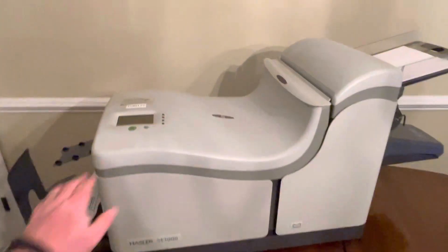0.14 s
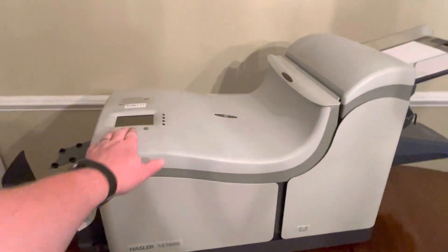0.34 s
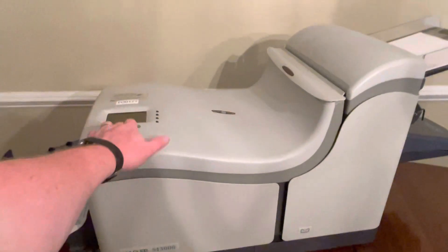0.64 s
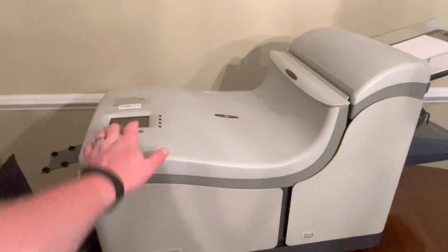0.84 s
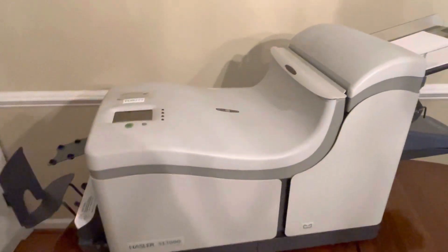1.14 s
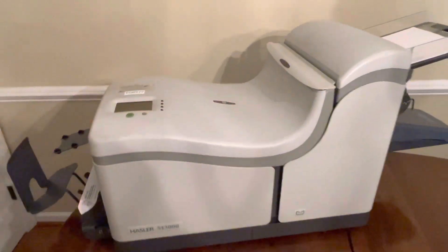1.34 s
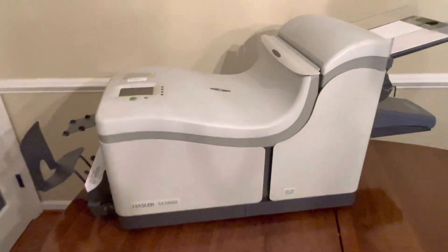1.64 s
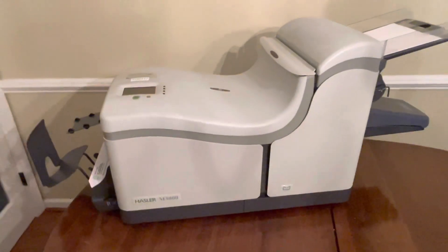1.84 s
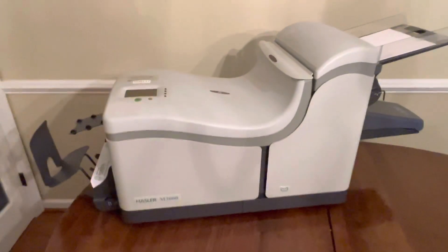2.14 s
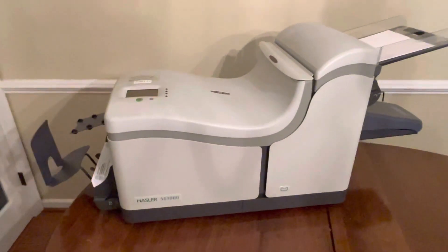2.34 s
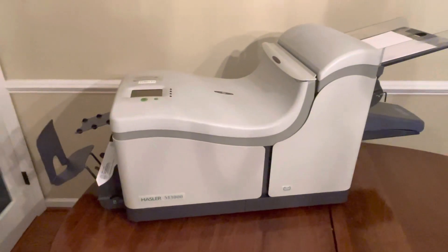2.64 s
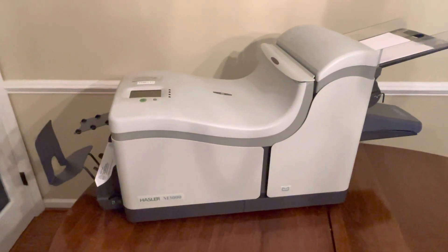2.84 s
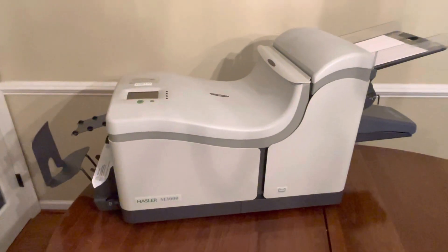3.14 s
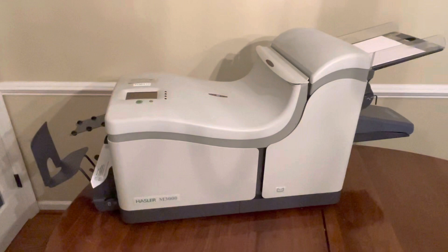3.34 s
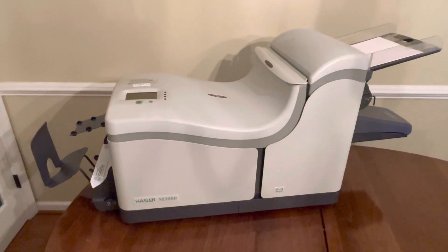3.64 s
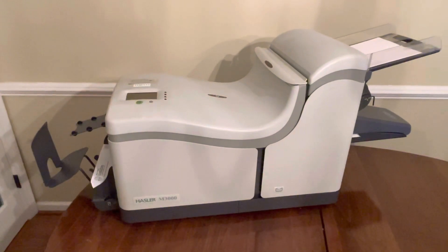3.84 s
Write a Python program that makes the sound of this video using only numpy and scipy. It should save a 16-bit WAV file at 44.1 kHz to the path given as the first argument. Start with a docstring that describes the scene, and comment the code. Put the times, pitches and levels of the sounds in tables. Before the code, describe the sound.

A paper folding machine on a wooden table: near silence, light hand touches and a button click, then motor start, rattling hum, clunks, a sharp metallic snap and paper rustle; close stereo in a small room.

```python
"""A paper folding machine on a wooden table starts up, heard in stereo in a small quiet room.
Brushing noise, finger taps and damped bumps place a hand on the case, which presses the button. A relay ticks
and the motor whines up, then hums in wavering tones over rumbling noise and a growing rattle of dense impacts.
Levers clunk in bursts with a room tail, a steel clutch snaps and rings in narrow dying bands,
and a sheet is drawn through as rustling noise with light ticks that ring the guides."""
import sys
import numpy as np
from scipy import signal
from scipy.fft import rfft, irfft, next_fast_len
from scipy.io import wavfile
from scipy.ndimage import map_coordinates

SR = 44100
rng = np.random.default_rng(int(sys.argv[2]) if len(sys.argv) > 2 else 0)


def persist_wave(psi):
    """Save psi, clipped to +-1, as 16-bit WAV."""
    counts = np.round(np.clip(psi, -1, 1) * 32767).astype(np.int16)
    wavfile.write(sys.argv[1], SR, np.atleast_2d(counts).T)


N = 176400

# how much later the left ear hears the rollers and the levers (s); negative: the left hears first
ROLLER_LAG_S, LEVER_LAG_S = -.00046, .00027
DIRECT_SHARE = .17  # share of the power that comes straight from the machine
# colour of skin on the case: f/Hz, relative level/dB per Hz
BRUSH_SPECTRUM = [(150, -7), (450, -2), (800, -12.5), (1500, -10.5), (2500, -10), (4500, -18), (8000, -35),
                  (14000, -28)]


def amp(db):
    """Decibels to an amplitude factor."""
    return 10 ** (np.asarray(db) / 20)


def unit(x):
    """Scale a sound to rms 1, over both ears together."""
    return x / np.sqrt(np.mean(x ** 2) + 1e-20)


def along(points, hz):
    """Read (f/Hz, value) points on a log frequency axis."""
    f, v = np.transpose(points)
    return np.interp(np.log(hz + 1), np.log(f + 1), v)


def curves(rows):
    """One value per sample for each column after the time."""
    s, *cols = np.transpose(rows)
    return [np.interp(np.arange(N) / SR, s, c) for c in cols]


def wobble(rate):
    """A smooth random curve through rate random knots a second."""
    at = np.linspace(0, N, 4096)
    knots = rng.standard_normal(2048)
    return np.interp(np.arange(N), at, map_coordinates(knots, [at * rate / SR], mode="mirror"))


def tilted(spectrum, slope):
    """The spectrum made brighter by slope dB per octave, pivoting at 1 kHz."""
    return [(hz, db + slope * np.log2(hz / 1000)) for hz, db in spectrum]


def add(out, s, sound):
    """Mix a sound in at time s."""
    part = out[:, round(s * SR):][:, :sound.shape[1]]
    part += sound[:, :part.shape[1]]


def coloured(three, spectrum, lag=ROLLER_LAG_S, share=DIRECT_SHARE):
    """Three unrelated signals become a stereo pair: diffuse room sound, near mono in the bass, plus direct sound."""
    # left-right likeness of the diffuse sound: f/Hz, correlation
    likeness = [(60, 0.78), (150, 1), (260, 0.84), (500, 0.82), (1000, 0.015), (4000, -0.075),
                (10000, 0.016)]
    housing_db, housing_grain_hz = 2.7, 35  # depth and spacing of the parts' many small resonances
    n = three.shape[1]
    m = next_fast_len(n + 8192)
    hz = np.fft.rfftfreq(m, 1 / SR)
    turn = np.arccos(np.clip(along(likeness, hz), -1, 1)) / 2
    ripple = map_coordinates(rng.standard_normal(1024), [hz / housing_grain_hz], mode="mirror")
    ripple *= np.clip(hz / 1500, 0, 1)  # shallower in the bass
    a, b, c = rfft(three, m) * amp(along(spectrum, hz) + housing_db * ripple)
    ears = np.array([[1], [-1]])
    diffuse = a * np.cos(turn) + ears * b * np.sin(turn)
    # half the lag delays the left ear, half advances the right
    direct = c * np.exp(-1j * np.pi * hz * lag * ears)
    pair = np.sqrt(1 - share) * diffuse + np.sqrt(share) * direct
    return unit(irfft(pair, m)[:, :n])


def noise(spectrum, size=N, lag=ROLLER_LAG_S):
    """Steady stereo noise of rms 1 with this spectrum."""
    return coloured(rng.standard_normal((3, size)), spectrum, lag)


def blow(spectrum, rise, t60, room_db, lag=ROLLER_LAG_S):
    """A contact: a short burst from the parts and a room tail that fades at its own rate at each pitch."""
    # fading of the room: f/Hz, t60/s
    room_fade = [(100, 0.54), (500, 0.46), (2000, 0.38), (5000, 0.45), (12000, 0.27)]
    t = np.arange(SR // 2) / SR
    hz, s, z = signal.stft(noise(spectrum, size=len(t), lag=lag), SR, nperseg=256)
    fading = z * amp(-60 * s / along(room_fade, hz)[:, None])
    tail = signal.istft(fading, SR, nperseg=256)[1][:, :len(t)]
    burst = noise(spectrum, size=len(t), lag=lag) * amp(-60 * t / t60)
    return (burst + amp(room_db) * tail) * (1 - np.exp(-t / rise))


def click(lag):
    """The first crack of a hard contact: decaying noise straight from the machine to both ears."""
    # f/Hz, relative level/dB per Hz
    crack_spectrum = [(500, -20), (3000, 3), (8500, -5), (12000, 1), (15500, -7)]
    t60 = 0.011  # s
    t = np.arange(SR // 20) / SR
    burst = rng.standard_normal((3, len(t))) * amp(-60 * t / t60)
    burst = np.roll(burst, SR // 1000, axis=1)  # 1 ms of room for the ear that hears first
    pair = coloured(burst, crack_spectrum, lag, share=1)
    # set the energy by the decay, not by the length of the buffer
    return pair * np.sqrt(t60 * SR / len(t) / np.log(1000))


def ring(modes, rise, spread):
    """Damped sine modes; the higher ones reach the two ears further out of step."""
    t = np.arange(SR // 2) / SR
    out = np.zeros((2, len(t)))
    for hz, db, t60 in modes:
        phase = rng.uniform(0, 2 * np.pi) + spread * hz / 500 * rng.standard_normal((2, 1))
        out += amp(db - 60 * t / t60) * np.sin(2 * np.pi * hz * t + phase)
    return out * (1 - np.exp(-t / rise))


def jangle(clusters, rise):
    """Clusters of close modes: each is a narrow band of noise that dies away."""
    t = np.arange(SR // 2) / SR
    f = np.fft.rfftfreq(len(t), 1 / SR)
    out = np.zeros((2, len(t)))
    for hz, width, db, t60 in clusters:
        spectrum = rfft(rng.standard_normal((2, len(t)))) / (1 + (2 * (f - hz) / width) ** 4)
        out += unit(irfft(spectrum, len(t))) * amp(db - 60 * t / t60)
    return out * (1 - np.exp(-t / rise))


def tones(lines, waver_db, drift, speed=1):
    """Lines on a shared, slightly unsteady shaft speed; each flutters on its own, the bass ones less."""
    # the left-right part changes as the microphone moves: t/s, level/dB of the opposite part
    stereo_width = [(.75, -1), (1.5, -4), (2.2, -3), (2.6, -1), (4, -2)]
    waver_per_s = 15
    shaft = np.cumsum(speed + drift * wobble(7)) / SR
    width_db, = curves(stereo_width)
    out = np.zeros((2, N))
    for hz, common_db, opposite_db in lines:
        loose = min(hz / 200, 1)  # full flutter from 200 Hz up
        phase = 2 * np.pi * hz * shaft + rng.uniform(0, 2 * np.pi) + 0.32 * loose * wobble(16)
        common_waver = loose * waver_db * (wobble(waver_per_s) - 0.99)
        opposite_waver = loose * waver_db * (wobble(waver_per_s) - 1.14)
        common = amp(common_db + common_waver) * np.sin(phase)
        opposite = amp(opposite_db + width_db + opposite_waver) * np.cos(phase)
        out += np.sqrt(2) * np.array([common + opposite, common - opposite])
    return out


def quiet_room():
    """Faint room noise with a low, gently wavering tone."""
    # f/Hz, relative level/dB per Hz
    room_spectrum = [(25, -23), (55, 6), (110, -10), (190, -12), (310, -25), (550, -28), (1150, -37),
                     (2400, -28), (6500, -42), (15000, -45)]
    low_tone = tones([(196, 0.014, -9)], waver_db=2.0, drift=0.0032)
    return amp(-73.5) * noise(room_spectrum) + amp(-79) * low_tone


def hand_brush():
    """Skin brushing the case: noise whose level follows the hand and trembles."""
    # t/s, level/dB
    brush_level = [(0, -77), (.06, -88), (.13, -92), (.19, -91), (.26, -76), (.33, -83), (.4, -84),
                   (.45, -90), (.53, -68.5), (.65, -84)]
    return amp(curves(brush_level)[0] + 3.5 * wobble(32.7)) * noise(BRUSH_SPECTRUM)


def touches():
    """Fingers tap the case lightly on their way to the button: short bright bursts."""
    # t/s, level/dB
    taps = [(.243, -71), (.366, -72), (0.531, -61)]
    out = np.zeros((2, N))
    for s, db in taps:
        add(out, s, amp(db) * blow(tilted(BRUSH_SPECTRUM, 1.8), rise=.0006, t60=.025, room_db=-12))
    return out


def bumps():
    """The hand and the starting jolt shake the case, and the machine rocks on its table in damped low modes."""
    # t/s, level/dB
    shakes = [(0.314, -55), (0.349, -58), (.383, -52), (0.413, -56.5), (.485, -57), (.555, -51),
              (0.673, -44)]
    # f/Hz, relative level/dB, t60/s
    rocking_modes = [(51.5, -2.5, 0.37), (77, -2, 0.23), (125, -10, .1)]
    out = np.zeros((2, N))
    for s, db in shakes:
        add(out, s, amp(db) * ring(rocking_modes, rise=.003, spread=.5))
    return out


def paper():
    """The sheet slides over the rollers as noise; edges and pawls crack, tick and ring the thin guides."""
    # sliding of the sheet: t/s, level/dB
    slide_level = [(.45, -87.5), (.53, -74), (.645, -74), (.67, -50.5), (.9, -49.5), (1.07, -47.5),
                   (1.2, -52.5), (1.55, -53), (2.3, -52), (2.47, -47), (2.52, -41), (2.72, -45),
                   (2.82, -42.5), (2.97, -44), (3.2, -45), (3.5, -45.5), (3.7, -46), (4, -50.5)]
    # rustle, then tick: f/Hz, relative level/dB per Hz
    rustle_spectrum = [(500, -8), (1500, 7), (2500, 4), (4000, 1.5), (5500, -2.5), (7000, -5),
                       (8700, -15.5), (10500, -7.5), (13300, -19), (14400, -72), (16000, -50)]
    tick_spectrum = [(500, -46), (2000, 0), (3300, 2.5), (5500, 10.5), (8500, 0.5), (11000, 6), (13500, 1),
                     (16000, -40)]
    # edges and pawls: t/s, level/dB, brightness/dB per octave, first crack/dB relative to the tick
    edge_ticks = [(.727, -57, 2, 8), (0.961, -49, -1, -10), (1.045, -53, 11, -8), (1.073, -46, -1, -8),
                  (1.436, -46, -11, -15), (2.338, -50.5, 0, -8), (2.443, -45.5, -11, -14),
                  (2.494, -39, -1.5, -8), (2.551, -40.5, -4.5, -13), (2.603, -39, -2.5, -8),
                  (2.667, -40, -4, -15), (2.722, -40.5, -0.5, -1), (2.838, -35.5, -5, -6),
                  (2.935, -40, -6, -17), (2.961, -40.5, 2, -11), (3.084, -46, -2, -6),
                  (3.384, -48, -7, -15), (3.461, -45, -2, -8)]
    # thin guides: f/Hz, width/Hz, relative level/dB, t60/s
    guide_modes = [(2230, 300, -1, 0.26), (4200, 350, 0, 0.22), (5370, 750, 5, 0.29),
                   (6500, 300, -33, 0.14)]
    guide_db = -16  # ring of the guides against the tick
    out = amp(curves(slide_level)[0] + 1.2 * wobble(35.27) + 0.2 * wobble(390)) * noise(rustle_spectrum)
    for s, db, bright, crack_db in edge_ticks:
        add(out, s, amp(db + crack_db) * click(ROLLER_LAG_S))
        tick = blow(tilted(tick_spectrum, bright), rise=0.00062, t60=0.046, room_db=-2.5)
        guides = amp(guide_db) * jangle(guide_modes, rise=0.0029)
        add(out, s, amp(db) * (tick + guides))
    return out


def button():
    """The button's click: a dull burst with a room tail."""
    # f/Hz, relative level/dB per Hz
    button_spectrum = [(100, -7), (400, 5), (650, -3), (900, -9), (1300, -5), (2000, -25), (9000, -52)]
    out = np.zeros((2, N))
    add(out, .553, amp(-42.5) * blow(button_spectrum, rise=0.007, t60=0.13, room_db=-5))
    return out


def knocks():
    """Knocks that ring the panels in damped modes; the first is the button press."""
    # t/s, level/dB
    panel_knocks = [(.556, -37.5), (0.759, -31.5), (.905, -35), (2.195, -25.5)]
    # f/Hz, relative level/dB, t60/s
    panel_modes = [(204.8, 2.5, 0.42), (256.1, -0.5, 0.41), (437, -2, 0.25), (517.5, -3, 0.26),
                   (682, 0, 0.14), (1360, -18, .1)]
    out = np.zeros((2, N))
    for s, db in panel_knocks:
        add(out, s, amp(db) * ring(panel_modes, rise=0.034, spread=0.49))
    return out


def relay():
    """The relay closes: hard cracks, each with a short ring in two narrow bands."""
    # t/s, level/dB
    closings = [(0.632, -54), (0.644, -43.5)]
    # f/Hz, width/Hz, relative level/dB, t60/s
    relay_bands = [(2900, 320, -9, 0.033), (3200, 250, -7, 0.059)]
    crack_db = -1  # against the ring
    out = np.zeros((2, N))
    for s, db in closings:
        add(out, s, amp(db) * jangle(relay_bands, rise=0.00061))
        add(out, s, amp(db + crack_db) * click(LEVER_LAG_S))
    return out


def whine():
    """The motor's brief whine: tones that overshoot in pitch, then settle under load."""
    # f/Hz, level/dB common to both ears, level/dB opposite between them, before the level curve
    whine_tones = [(207, -46, -62), (446, -62, -58), (642, -37.5, -46), (810, -45, -45), (830, -43, -46),
                   (1274, -51, -53)]
    # t/s, level/dB
    whine_level = [(.645, -35), (.665, -7), (.69, -5), (.712, 1.5), (.76, 0), (.82, -10), (.95, -16),
                   (1.1, -60)]
    start_s, overshoot, settle_s = .65, .035, .05  # overshoot as a share of the speed
    t = np.arange(N) / SR
    settling = 1 + overshoot * np.exp(-np.maximum(t - start_s, 0) / settle_s)
    sound = tones(whine_tones, waver_db=1.5, drift=0.005, speed=settling)
    return amp(curves(whine_level)[0]) * sound * (t > whine_level[0][0])


def gears():
    """Dense uneven tooth and belt impacts rattle the plastic housing for a moment, over their wash in the room."""
    # f/Hz, relative level/dB per Hz
    rattle_spectrum = [(25, -48), (100, -28), (250, -3), (410, -4), (570, -5), (720, -7), (900, -3),
                       (1150, -5.5), (1300, -8), (1550, -11), (1900, -14), (2350, -14.5), (2850, -20),
                       (3500, -19), (4400, -25.5), (5300, -29.5), (6800, -34), (8500, -62), (11000, -87),
                       (13300, -48), (14300, -62), (16000, -85)]
    hits_per_s, spread_db, impact_share = 330, 3, .5  # share of the rattle's power in distinct impacts
    t = np.arange(SR // 40) / SR
    strengths = amp(spread_db * np.clip(rng.standard_normal(N), -2, 2))
    hits = (rng.random(N) < hits_per_s / SR) * strengths
    # the power of overlapping hits adds up; each has an amplitude t60 of 23 ms
    strength = np.sqrt(np.abs(signal.fftconvolve(hits ** 2, amp(-120 * t / 0.023))[:N]))
    impacts = coloured(strength * rng.standard_normal((3, N)), rattle_spectrum)
    return np.sqrt(impact_share) * impacts + np.sqrt(1 - impact_share) * noise(rattle_spectrum)


def clatter():
    """Loose rollers and guides knock at random, each knock with its own pitches and strength."""
    knocks_per_s, range_db, t60 = 45, 14, .05  # t60 in s
    middle_hz, spread_octaves = 750, .6
    out = np.zeros((2, N))
    t = np.arange(SR // 12) / SR
    envelope = amp(-60 * t / t60) * (1 - np.exp(-t / 0.00039))
    for at, size in rng.random((int(knocks_per_s * N / SR), 2)):
        hz = middle_hz * 2 ** (spread_octaves * rng.standard_normal((6, 1)))
        phase = rng.uniform(0, 2 * np.pi, (6, 1)) + hz / 1000 * rng.standard_normal((2, 6, 1))
        modes = np.sin(2 * np.pi * hz * t + phase).mean(axis=1)
        add(out, at * (N - 1) / SR, amp(range_db * size) * modes * envelope)
    return unit(out)


def drive():
    """Motor hum, roller rumble, gear rattle and the boom of the table top come up together with the speed."""
    # t/s, hum level/dB, rumble level/dB, rattle level/dB, boom level/dB, each before its trim below
    drive_level = [(.7, -10, -44, -44.5, -56), (.95, -1, -40, -40.5, -63), (1.2, -2.5, -41.5, -43.5, -73),
                   (1.65, 1.5, -46.5, -40, -49), (2.0, 2, -41.5, -39.5, -50), (2.25, 5, -42.5, -37, -59),
                   (2.45, 3, -37.5, -37, -52), (2.65, 4.5, -43, -33.5, -47), (3.1, 5, -38.5, -34.5, -50),
                   (3.5, 6, -38, -33, -52), (4.0, 6, -36.5, -34, -54)]
    # motor, belts and gears, standing in the room, before the hum level:
    # f/Hz, level/dB common to both ears, level/dB opposite between them
    hum_tones = [(80.15, -50.5, -79), (116.7, -50, -75), (121, -41.5, -75), (143.5, -42.5, -75),
                 (199.6, -46, -67), (206.4, -39.5, -77), (225, -48.5, -59), (257.9, -42.5, -56),
                 (289.7, -50, -59), (358.4, -50.5, -49), (449, -52.5, -45), (523.7, -56, -54),
                 (595, -53, -65), (646.8, -45.5, -45), (699, -51, -54), (774, -57, -44), (826, -55, -52),
                 (843, -52, -51), (1001, -54.5, -60), (1250, -55, -62), (1364, -58, -49.5)]
    # rollers, then table top: f/Hz, relative level/dB per Hz
    rumble_spectrum = [(25, -45), (60, -12), (100, -7.5), (130, -6.5), (170, -4), (215, -1), (270, -7),
                       (330, -4), (420, -2), (700, -21), (2000, -85)]
    boom_spectrum = [(20, -40), (32, -26), (41, -10), (52, 18), (62, 1), (76, 22.5), (95, -2), (130, -55)]
    start_s, spin_up_s = .65, .052
    hum_trim_db, clatter_db = -2, -8.5  # clatter against the gears
    hum_db, rumble_db, rattle_db, boom_db = curves(drive_level)
    speed = np.clip((np.arange(N) / SR - start_s) / spin_up_s, 0, 1)
    hum = amp(hum_db + hum_trim_db) * tones(hum_tones, waver_db=3.8, drift=0.0015)
    rumble = amp(rumble_db + 0.92 * wobble(23)) * noise(rumble_spectrum)
    boom = amp(boom_db) * noise(boom_spectrum)
    rattle = amp(rattle_db + 0.59 * wobble(20) - 0.89) * (gears() + amp(clatter_db) * clatter())
    return speed ** 2 * hum + np.sqrt(speed) * (rumble + boom + rattle)


def levers():
    """Plastic levers and cams clunk: a burst from the parts over a thud of the frame."""
    # t/s, level/dB, rise/s, brightness/dB per octave, thud level/dB
    lever_clunks = [(.763, -35.5, 0.0033, 0, -31.5), (1.019, -39, 0.0097, -2.5, -47),
                    (1.066, -37, 0.0028, -3.5, -44), (1.236, -46.5, 0.0028, 0, -40),
                    (3.06, -39, 0.0037, 0.5, -42), (3.263, -53, 0.002, -8, -49),
                    (3.379, -40, 0.0017, -4, -39), (3.461, -36.5, 0.0035, -2, -50),
                    (3.501, -41.5, 0.0022, -1.3, -52)]
    # lever, then frame: f/Hz, relative level/dB per Hz
    clunk_spectrum = [(60, -25), (200, -13), (420, 1), (700, -4), (1400, -4.5), (3200, -7.5), (5500, -13.5),
                      (8500, -30.5), (11000, -24.5), (13500, -33), (15500, -58)]
    thud_spectrum = [(150, -27), (300, -15), (430, 16), (560, 0), (800, 4), (1500, -56)]
    out = np.zeros((2, N))
    for s, db, rise, bright, thud_db in lever_clunks:
        clunk = blow(tilted(clunk_spectrum, bright), rise, t60=0.18, room_db=6.0, lag=LEVER_LAG_S)
        add(out, s, amp(db) * clunk)
        add(out, s, amp(thud_db) * blow(thud_spectrum, rise=0.0076, t60=0.52, room_db=-4.5))
    return out


def clutch():
    """The steel clutch touches, snaps in and bounces; each contact cracks and rings its plate."""
    # t/s, level/dB, first crack/dB relative to the blow
    contacts = [(1.296, -43, -6), (1.3015, -27, 2), (1.311, -27, -4), (1.327, -34, -7)]
    # f/Hz, relative level/dB per Hz
    snap_spectrum = [(100, -39), (350, 10), (700, 2.5), (1300, 2.5), (2400, 2.5), (3200, -2.5), (4500, 1),
                     (5500, -2.5), (7000, -8), (9000, -9.5), (11000, -11.5), (13500, -11), (16000, -49)]
    # clutch plate: f/Hz, width/Hz, relative level/dB, t60/s
    plate_modes = [(1239, 25, -7, 0.53), (2060, 360, -7.5, 0.46), (2650, 150, -13, 0.48),
                   (4270, 270, -2.5, 0.48), (4600, 180, -2.5, 0.54), (5170, 200, -17, 0.38),
                   (6820, 300, -11, 0.41)]
    plate_db = -9  # ring of the plate against the snap
    out = np.zeros((2, N))
    for s, db, crack_db in contacts:
        snap = blow(snap_spectrum, rise=0.0016, t60=0.036, room_db=-1.5, lag=LEVER_LAG_S)
        plate = amp(plate_db) * jangle(plate_modes, rise=0.0012)
        add(out, s, amp(db) * (snap + plate))
        add(out, s, amp(db + crack_db) * click(LEVER_LAG_S))
    return out


def scene():
    """The quiet room, the hand and the machine together."""
    hand = hand_brush() + touches() + bumps() + button() + knocks()
    machine = relay() + whine() + drive() + levers() + clutch()
    return quiet_room() + hand + paper() + machine


def record(dry):
    """The two microphones differ a little in colour and keep nothing above their band limit."""
    top_hz = 15900
    m = next_fast_len(N + 8192)
    hz = np.fft.rfftfreq(m, 1 / SR)
    # left minus right: f/Hz, level/dB
    lean = [(60, 0.1), (250, -1.7), (500, 2.0), (1000, 0.5), (2000, -3), (4000, 0.1), (12000, 1.7)]
    colour = amp(along(lean, hz) * np.array([[.5], [-.5]]))
    return irfft(rfft(dry, m) * colour * (hz < top_hz), m)[:, :N]


dry = scene()
out = record(dry)
persist_wave(out)
```